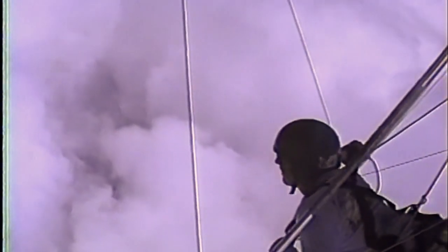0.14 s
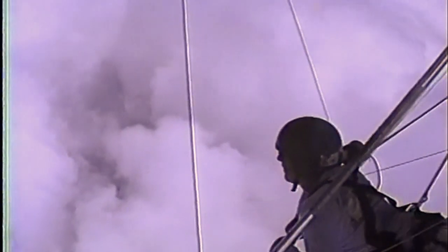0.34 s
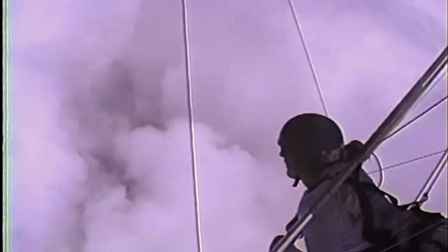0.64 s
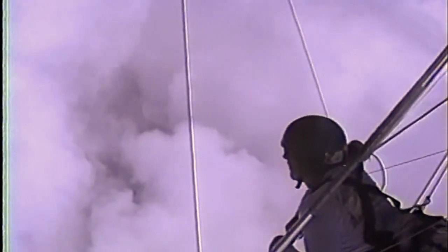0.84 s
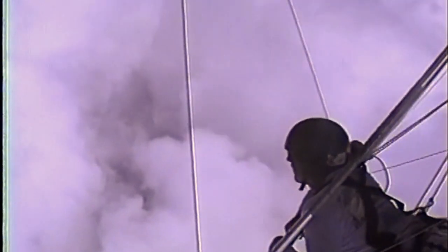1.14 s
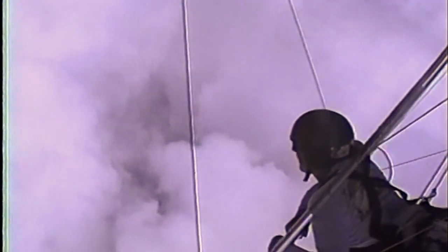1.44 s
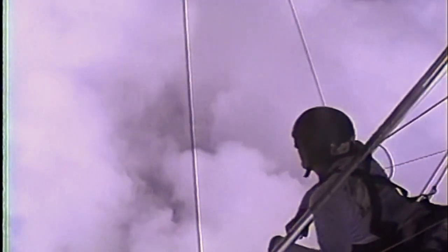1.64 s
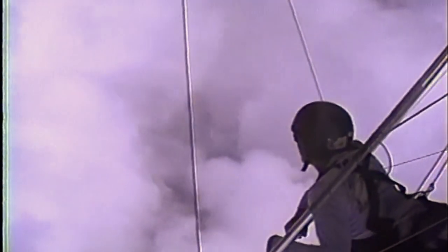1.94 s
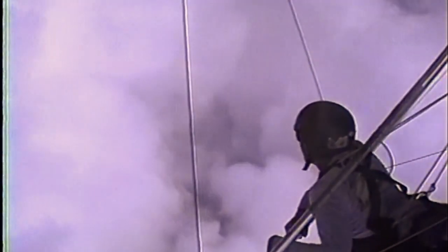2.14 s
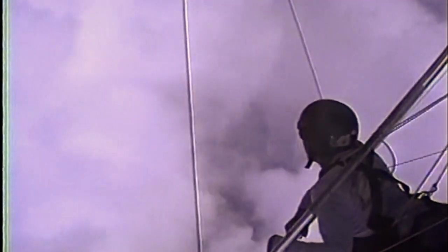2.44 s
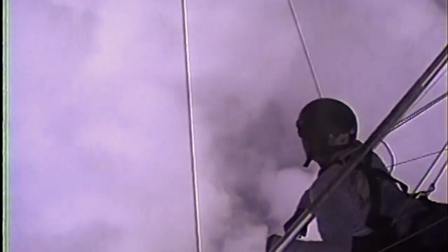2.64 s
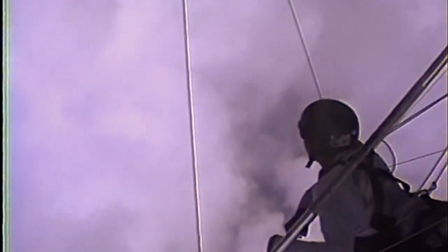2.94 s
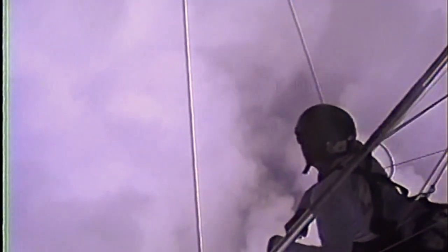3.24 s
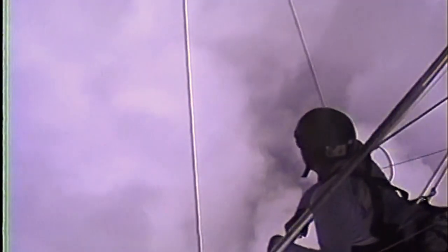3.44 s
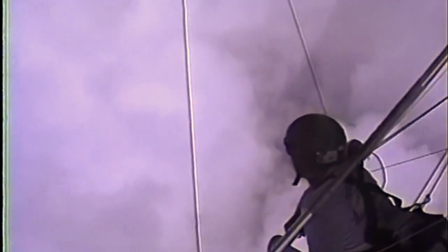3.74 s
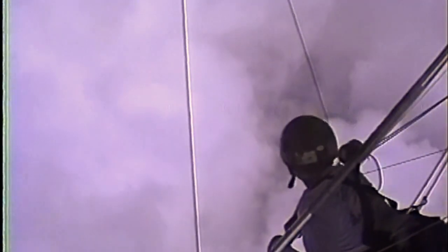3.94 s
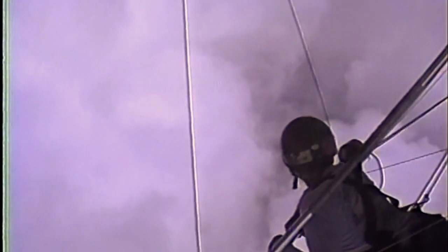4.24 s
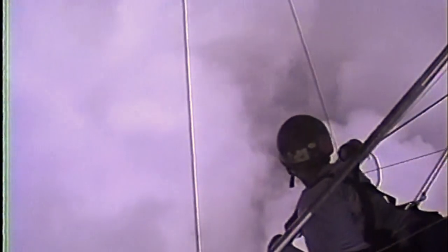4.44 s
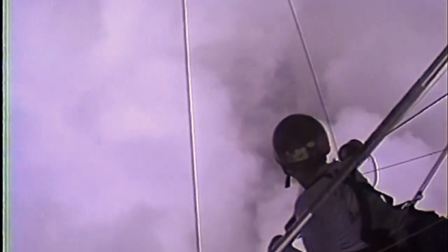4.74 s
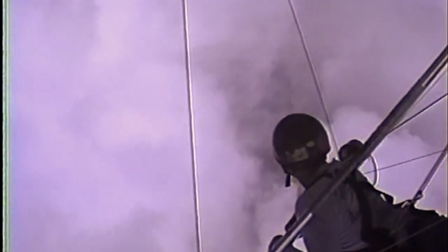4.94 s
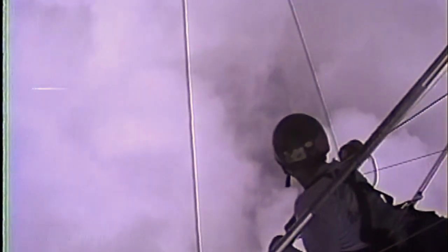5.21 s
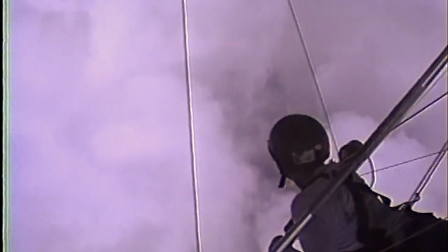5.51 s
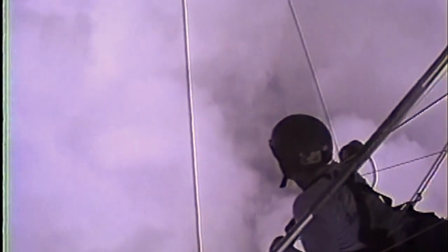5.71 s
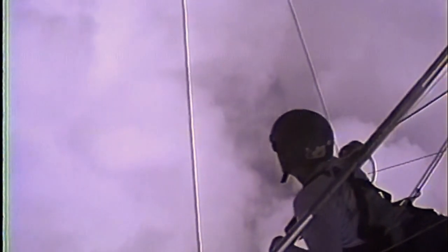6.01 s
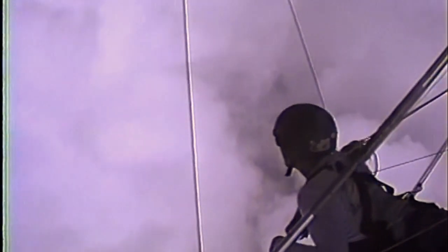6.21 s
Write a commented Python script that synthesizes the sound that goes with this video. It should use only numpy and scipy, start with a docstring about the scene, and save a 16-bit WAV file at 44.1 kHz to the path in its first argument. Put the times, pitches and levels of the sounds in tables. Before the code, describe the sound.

From 0 seconds a dull, low-mid roar of wind presses on a single close microphone aboard a hang glider, continuous from start to finish, with no echo. Small gusts and brief lulls make it flutter unevenly. Under it is a faint low throb of the frame; behind it, slight camera hiss and a very thin, steady, extremely high whine. Tiny bright dry ticks of a loose part run quickly from 0 to about 0.65 seconds, then stop. Only wind follows, with barely perceptible, very high pips now and then until about 3. From around 2.9 the airy hiss rises, strongest near 3.3 to 4.5, making the wind brighter. At about 3.9 the ticks return, some twenty-five per second in longer runs with short gaps, until 6.1. The hiss eases after 5, dropping back by 6; one last faint pip sounds near 6.1, and wind continues to the end at about 6.3.

```python
"""Wind rushes in gusts and lulls over the microphone of a tape camera on a hang glider in flight.
From the start, shaped noise makes a dull roar, a hiss that grows with air speed, and a low frame throb,
over the camera's faint hiss and a thin, very high whine made of steady tones.
A loose part ticks at once in a quick run of short rings; soon faint, very high pips of narrow noise begin.
The hiss is strongest past the middle; then the ticks return in longer runs, and a last pip sounds near the end."""
import sys
import numpy as np
from scipy import signal
from scipy.fft import rfft, irfft, next_fast_len
from scipy.io import wavfile

SR = 44100
rng = np.random.default_rng(int(sys.argv[2]) if len(sys.argv) > 2 else 0)


def waveform_to_disk(signal):
    """Save audio, clipped to [-1, 1], as 16-bit WAV at the path in sys.argv[1]."""
    frames = np.transpose(np.atleast_2d(signal))
    scaled = np.clip(frames, -1, 1) * 32767
    samples = np.round(scaled).astype(np.int16)
    wavfile.write(sys.argv[1], SR, samples)


N = 280917  # length in samples

# air speed, heard as hiss: (time [s], hiss level before the wind's own settings [dB])
AIR_SPEED = [(0.05, -47), (0.5, -46.5), (1.0, -47.2), (1.55, -45.5), (2.15, -45), (2.5, -46), (2.95, -43),
             (3.35, -41), (3.75, -40.5), (4.15, -41), (4.5, -41), (4.9, -42), (5.15, -43), (5.6, -43.5),
             (6.0, -46), (6.3, -46.8)]
# tone of the slow turbulence at the microphone: (frequency [Hz], relative level per Hz [dB])
ROAR_SPECTRUM = [(20, -36), (50, -13), (75, -7), (130, -3), (240, -0.5), (380, 0), (550, -2.5), (780, -7),
                 (1100, -14.5), (1600, -24.5), (2500, -39), (4000, -78.5)]
# tone of the fine eddies in faster air: (frequency [Hz], relative level per Hz [dB])
HISS_SPECTRUM = [(200, -18), (500, -8), (800, 3.5), (1300, -3), (2000, -11), (3200, -22.5), (4200, -29.5),
                 (5000, -33.5), (6400, -38.5), (7700, -47), (10400, -47.5), (12000, -54), (15500, -58)]
# strong gusts and lulls: (time of peak [s], length [s], roar swell [dB], hiss swell [dB])
STRONG_GUSTS = [(0.335, 0.07, -4, -1), (0.43, 0.099, 2, 2.7), (0.544, 0.042, -3.5, -1),
                (0.653, 0.073, -2, -0.5), (0.74, 0.17, 1.5, 1.2), (0.852, .1, -1.5, -2),
                (1.085, 0.14, -1.3, -2), (1.15, .07, -0.5, 2), (1.474, 0.21, 1.6, 0.7),
                (1.674, 0.14, 2.3, -1), (1.785, 0.094, 1.5, -1.5), (1.96, 0.2, 1.5, -0.5),
                (2.132, .08, -2.5, 0), (2.235, 0.045, 1.5, 0), (2.325, 0.054, -4, -2),
                (2.44, .16, 1.2, -.5), (2.625, 0.14, -1.5, .5), (2.925, 0.45, -0.8, -0.8),
                (3.132, 0.065, 2, 0.5), (3.2, 0.12, -1.5, -.7), (3.38, 0.14, -1.5, 1.5),
                (3.52, 0.077, 0, 1.4), (3.594, 0.061, -3.5, -.3), (3.67, .09, 2.1, 0.5),
                (3.888, 0.076, -4, 1), (3.963, 0.12, 1.2, 1.5), (4.137, 0.063, 2.5, 1),
                (4.249, 0.047, -5, 1), (4.403, 0.24, 1, 0.3), (4.59, 0.25, 1.4, 1.6), (4.66, 0.054, 0, -2),
                (4.852, 0.14, 0.2, 3), (4.983, 0.095, 4, 0), (5.277, 0.21, -3.5, 2), (5.785, 0.13, -2.5, 0),
                (5.955, 0.066, 2, -1), (6.022, 0.067, -2.5, 1), (6.135, 0.13, 0.8, 3)]
# resonances of the frame, shaken by the air: (frequency [Hz], width [Hz], level [dB])
FRAME_RESONANCES = [(31.4, 7.4, -45.5), (42, 7.3, -44)]
# tone of the camera's own noise: (frequency [Hz], relative level per Hz [dB])
CAMERA_SPECTRUM = [(100, 0), (5500, 0.5), (7500, -0.5), (10300, 2.5), (11800, -7.5), (15500, -7.5)]
# ticks of the loose part, in quick runs: (time [s], level [dB], hardness as treble tilt [dB per octave])
TICK_TIMES = [(0.0189, -48, -2), (0.0717, -52, -1.5), (0.1266, -54, -1), (0.2443, -54, -2),
              (0.3077, -56, -2), (0.416, -45, 0), (0.4708, -47, -1), (0.5257, -48, -1), (0.5806, -45, -2),
              (0.6374, -47, 0), (3.9315, -50, 0), (3.9729, -47, 2), (4.0118, -47, 1), (4.0522, -49, -2),
              (4.0904, -56, 8), (4.13, -49, -1), (4.1689, -44, -4), (4.2073, -46.5, -4), (4.2462, -50, 1),
              (4.2852, -46, 1), (4.3234, -50, 5), (4.363, -46, 1), (4.4004, -52, 5), (4.4393, -49, -2),
              (4.4782, -50, 3), (4.5545, -46.5, -3), (4.5925, -46, 2), (4.6304, -50, 0), (4.6693, -45, 0),
              (4.7087, -46, 1), (4.7865, -49.5, 1), (4.8664, -47.5, -1), (4.9077, -48, -5),
              (4.9487, -49.5, 1), (4.9894, -51.5, 1), (5.0294, -51, 4), (5.1093, -49, 9),
              (5.1477, -48.5, 0), (5.1861, -50, 2), (5.2609, -44, -8), (5.2969, -43, 0), (5.3318, -43, 2),
              (5.3672, -47, -2), (5.4036, -45, -2), (5.4405, -47.5, 0), (5.4774, -46, -1), (5.5134, -45, 3),
              (5.5498, -45, 0), (5.5857, -47, 5), (5.622, -47, 5), (5.6595, -49, -3), (5.7339, -50, -5),
              (5.8092, -48, -8), (5.8481, -45, -5), (5.8875, -43.5, -5), (5.9279, -45, -3),
              (6.0626, -47, 0), (6.109, -51, 2)]
# what each tick rings with: (frequency [Hz], level [dB], time to fade by 60 dB [s])
TICK_RINGS = [(4850, 6, 0.0027), (5650, 6.5, 0.0021), (6370, 3, 0.0027), (8500, -10, 0.002),
              (9700, -8, .0016), (12000, -14.5, .0016)]
# faint, very high pips: (time of peak [s], level before PIP_DB [dB])
PIP_TIMES = [(0.292, -80), (0.651, -80), (1.2321, -75), (1.5239, -75), (2.0847, -73), (2.2897, -73.5),
             (2.9607, -73), (6.119, -70.5)]

ROAR_DB = -22.5  # roar at mean speed, before gusts and brightening
BODY_HZ, BODY_PER_SPEED = 500, 0.24  # above this the roar gains extra dB for each dB of speed
FIZZ_HZ, FIZZ_PER_SPEED = 3000, 0.21  # above this the hiss gains extra dB for each dB of speed
GUST_EDGE_HZ = 680  # the gusts' hiss swell acts above this
GUST_HZ, GUST_DB = 4.2, 0.14  # ceaseless small gusts: top rate and depth
CAMERA_HISS_DB = -77
WHINE_HZ, WHINE_DB, FIELD_HZ = 15734.3, -85, 59.94
FAINT_TONE_HZ, FAINT_TONE_DB = 15746.9, -89  # a weaker tone heard just above the whine
PIP_HZ, PIP_S, PIP_DB = 12300, 0.03, -6  # pitch, length, level shift
EDGE_HZ = 15780  # upper limit of the sound


def amp(db):
    """Turns decibels into gain."""
    return 10 ** (np.asarray(db) / 20)


def unit(x):
    """Scales a sound to an average strength (rms) of 1."""
    return x / np.sqrt(np.mean(x ** 2) + 1e-30)


def colour(points, hz):
    """Gain of a spectrum table, joined by straight lines on a log frequency axis."""
    f, db = np.transpose(points)
    return amp(np.interp(np.log(hz + 1), np.log(f + 1), db))


def noise(gain_at):
    """Noise of rms 1 whose spectrum follows a function of frequency."""
    size = next_fast_len(N)
    spectrum = rfft(rng.standard_normal(size))
    shaped = spectrum * gain_at(np.fft.rfftfreq(size, 1 / SR))
    return unit(irfft(shaped, size)[:N])


def resonance(centre_hz, width_hz):
    """Noise gathered around one frequency; its gain is half at the edges of the width."""
    return noise(lambda hz: 1 / (1 + (2 * (hz - centre_hz) / width_hz) ** 2))


def wander(rate_hz):
    """Smooth random curve of rms 1 that moves up to about the given rate."""
    return noise(lambda hz: hz / (hz + 2) / np.sqrt(1 + (hz / rate_hz) ** 4))


def bell(t, length):
    """A smooth hump of height 1 centred on t = 0."""
    return np.cos(np.pi * np.clip(t / length, -0.5, 0.5)) ** 2


def low_cut(x, hz, order):
    """Weakens everything below hz (high-pass filter)."""
    return signal.sosfilt(signal.butter(order, hz, "high", fs=SR, output="sos"), x)


def brighten(x, hz, db):
    """Raises or lowers the part above hz by a curve in dB."""
    # filtering both ways keeps the top in step with the rest
    top = signal.sosfiltfilt(signal.butter(2, hz, "high", fs=SR, output="sos"), x)
    return x + top * (amp(db) - 1)


def add(mix, s, sound):
    """Adds a sound into the mix at time s."""
    part = mix[max(round(s * SR), 0):][:len(sound)]
    part += sound[:len(part)]


def gusts():
    """Swells of roar and hiss in dB: small random gusts plus strong ones that rise and fall smoothly."""
    t = np.arange(N) / SR
    strong = sum(np.outer([roar_db, hiss_db], bell(t - s, length))
                 for s, length, roar_db, hiss_db in STRONG_GUSTS)
    return strong + GUST_DB * wander(GUST_HZ)


def wind(hiss_db=7.5, push_share=0.23, buffet_hz=25, roar_buffet_db=-0.13, hiss_buffet_db=0.76):
    """Faster air lifts and brightens the hiss and opens the top of the roar; gusts swell both."""
    speed_db = np.interp(np.arange(N) / SR, *np.transpose(AIR_SPEED))
    faster_db = speed_db - speed_db.mean()
    roar_swell_db, hiss_swell_db = gusts()
    # quick pressure changes: as the hiss rises the roar dips very slightly
    buffet = wander(buffet_hz)

    roar_level = ROAR_DB + roar_swell_db + roar_buffet_db * buffet
    roar = noise(lambda hz: colour(ROAR_SPECTRUM, hz))
    roar = brighten(roar, BODY_HZ, BODY_PER_SPEED * faster_db)

    # the hiss also takes a share of the roar's swell
    hiss_level = hiss_db + speed_db + push_share * roar_swell_db + hiss_buffet_db * buffet
    hiss = noise(lambda hz: colour(HISS_SPECTRUM, hz))
    hiss = brighten(hiss, FIZZ_HZ, FIZZ_PER_SPEED * faster_db)
    hiss = brighten(hiss, GUST_EDGE_HZ, hiss_swell_db)
    return roar * amp(roar_level) + hiss * amp(hiss_level)


def frame():
    """Turbulence keeps the low resonances of the frame throbbing."""
    return sum(amp(db) * resonance(centre, width) for centre, width, db in FRAME_RESONANCES)


def camera(buzz=0.75):
    """Steady electronic hiss and a line-scan whine that buzzes with each picture field."""
    t = np.arange(N) / SR
    field_buzz = 1 + buzz * signal.sawtooth(2 * np.pi * FIELD_HZ * t)
    whine = unit(np.sin(2 * np.pi * WHINE_HZ * t) * field_buzz)
    faint_tone = unit(np.sin(2 * np.pi * FAINT_TONE_HZ * t))
    hiss = noise(lambda hz: colour(CAMERA_SPECTRUM, hz))
    return amp(CAMERA_HISS_DB) * hiss + amp(WHINE_DB) * whine + amp(FAINT_TONE_DB) * faint_tone


def tick_ring(t, hardness, chance, spread=0.015, uneven_db=1, pivot_hz=5500):
    """The loose part rings in several fading tones; a harder tick favours the high ones."""
    ring = np.zeros(len(t))
    for k, ((hz, mode_db, t60), (level_chance, pitch_chance, _)) in enumerate(zip(TICK_RINGS, chance)):
        tilt_db = hardness * np.log2(hz / pivot_hz)
        level = mode_db + tilt_db + uneven_db * level_chance - 60 * t / t60
        tone = np.sin(2 * np.pi * hz * (1 + spread * pitch_chance) * t)
        # neighbouring tones swing in opposite directions
        ring += (-1) ** k * amp(level) * tone
    return ring


def ticks(touch_db=-5, lag_s=0.00088, lag_spread=0.05, rise_s=0.00006, lowest_hz=4350):
    """Each tick is a double contact: a light touch, then the full blow about a millisecond later."""
    out = np.zeros(N)
    t = np.arange(SR // 100) / SR
    chances = rng.standard_normal((len(TICK_TIMES), len(TICK_RINGS), 3))
    for (s, db, hardness), chance in zip(TICK_TIMES, chances):
        blow = amp(db) * tick_ring(t, hardness, chance) * (1 - np.exp(-t / rise_s))
        lag = lag_s * (1 + lag_spread * chance[0, 2])
        add(out, s, amp(touch_db) * blow)
        add(out, s + lag, blow)
    # so small a part radiates almost nothing below its lowest tone
    return low_cut(out, lowest_hz, order=6)


def pips(width_hz=250):
    """Now and then a faint, narrow band of noise swells and fades at very high pitch."""
    t = np.arange(N) / SR
    level = sum(amp(db + PIP_DB) * bell(t - s, PIP_S) for s, db in PIP_TIMES)
    return level * resonance(PIP_HZ, width_hz)


def scene():
    """Open air, no echoes: everything meets at one microphone."""
    mix = wind() + frame() + camera() + ticks() + pips()
    return mix[None]  # one channel


def record(dry, low_cut_hz=16):
    """The microphone sheds the deepest rumble; then a steep filter removes what lies above EDGE_HZ."""
    edge = signal.firwin(2047, EDGE_HZ, window=("kaiser", 9), fs=SR)
    return signal.oaconvolve(low_cut(dry, low_cut_hz, order=2), edge[None], "same")


dry = scene()
out = record(dry)
waveform_to_disk(out)
```